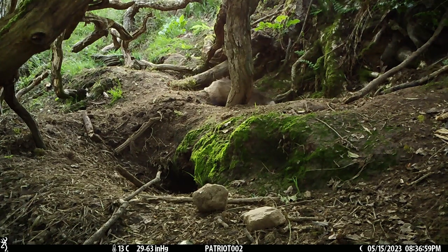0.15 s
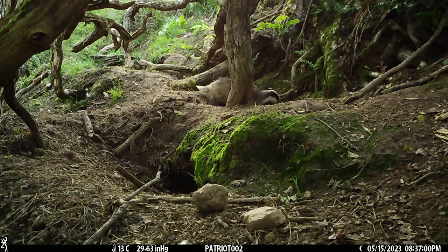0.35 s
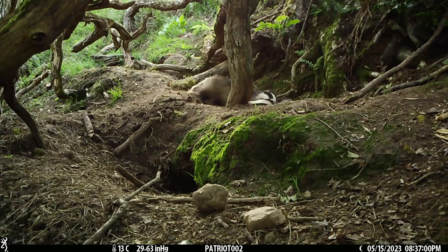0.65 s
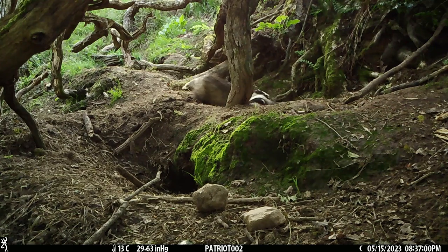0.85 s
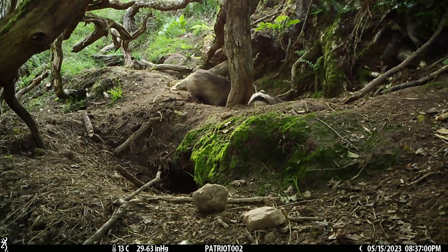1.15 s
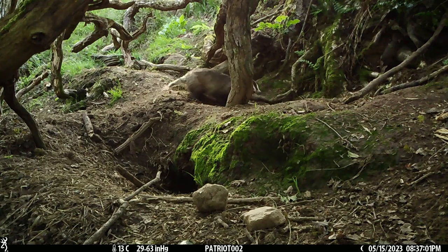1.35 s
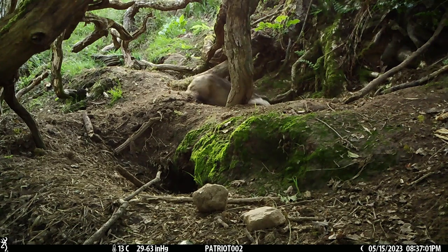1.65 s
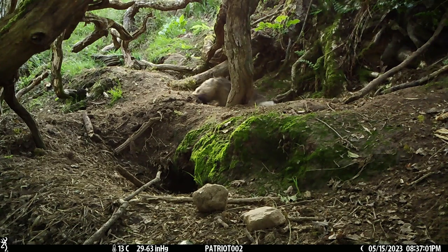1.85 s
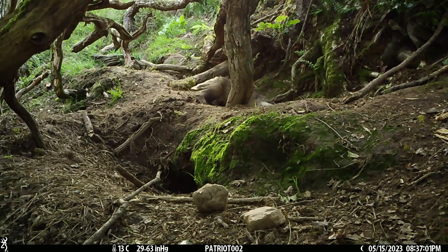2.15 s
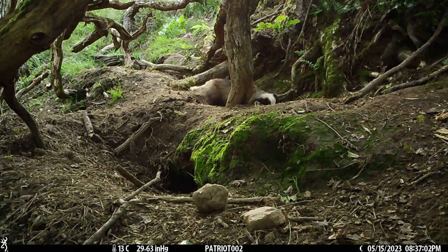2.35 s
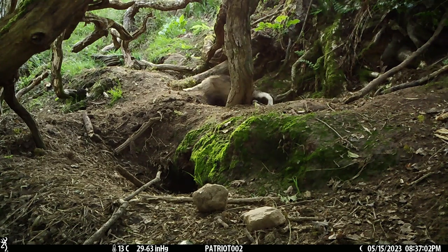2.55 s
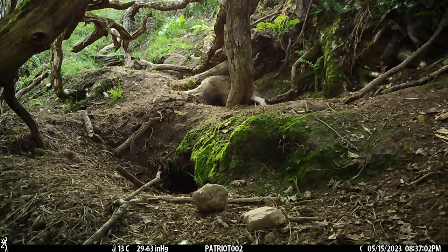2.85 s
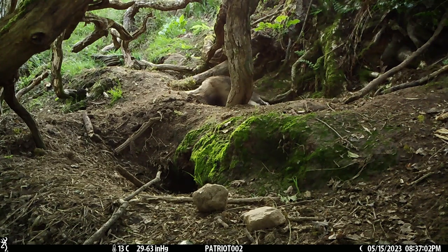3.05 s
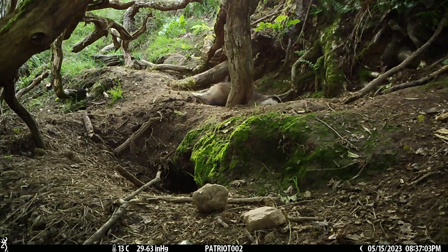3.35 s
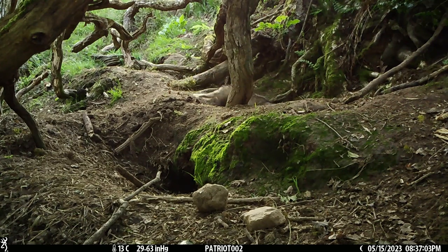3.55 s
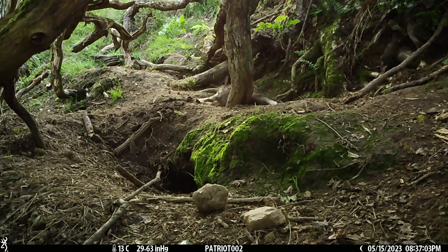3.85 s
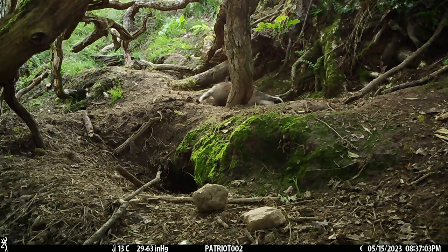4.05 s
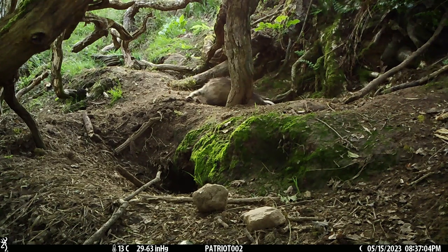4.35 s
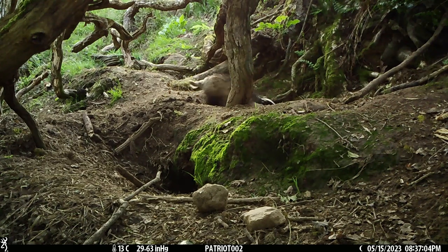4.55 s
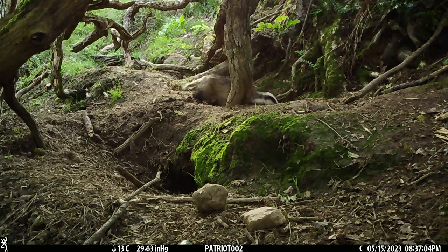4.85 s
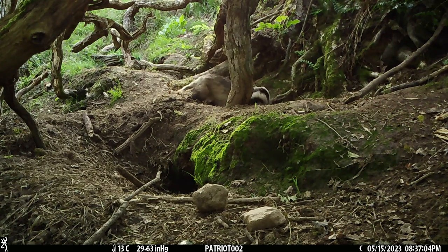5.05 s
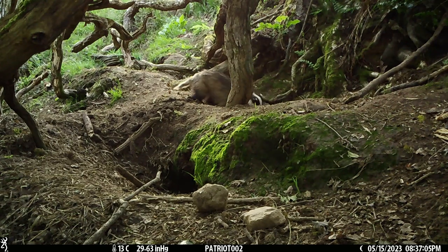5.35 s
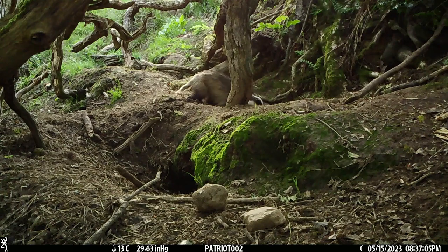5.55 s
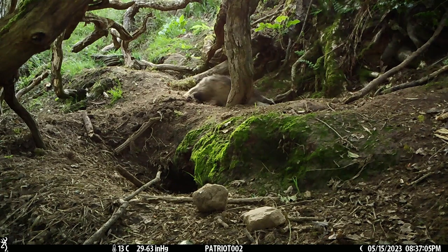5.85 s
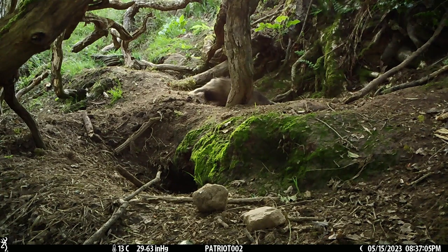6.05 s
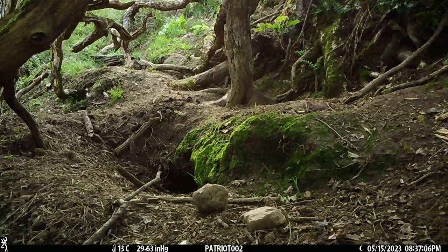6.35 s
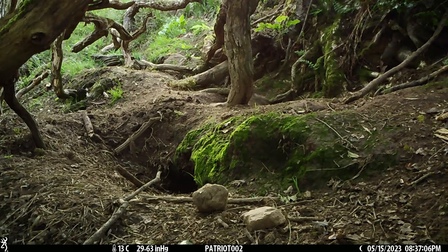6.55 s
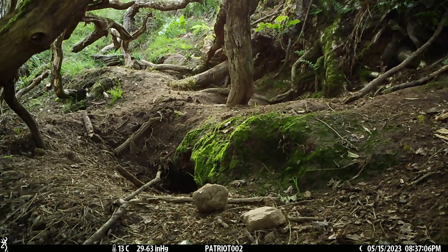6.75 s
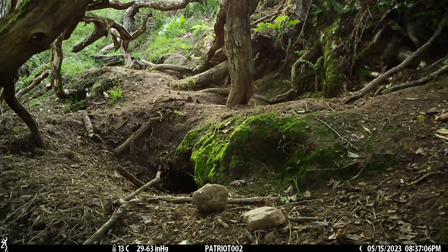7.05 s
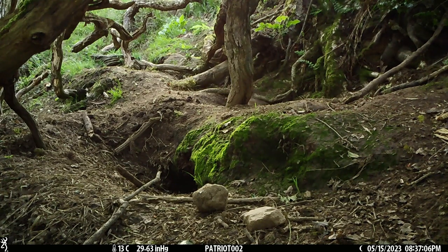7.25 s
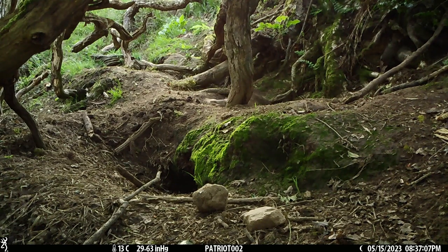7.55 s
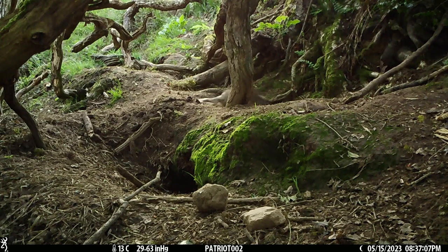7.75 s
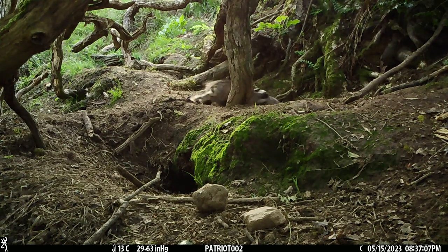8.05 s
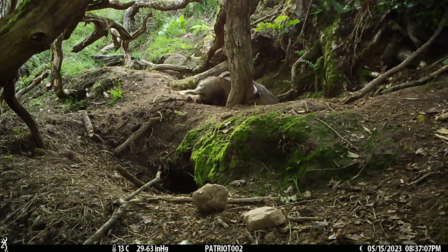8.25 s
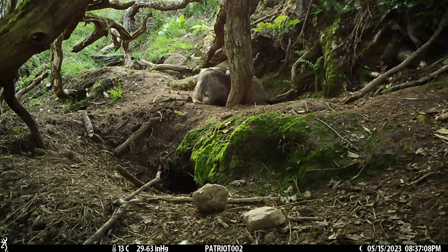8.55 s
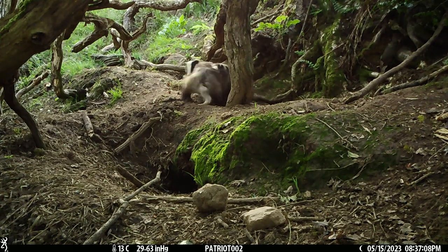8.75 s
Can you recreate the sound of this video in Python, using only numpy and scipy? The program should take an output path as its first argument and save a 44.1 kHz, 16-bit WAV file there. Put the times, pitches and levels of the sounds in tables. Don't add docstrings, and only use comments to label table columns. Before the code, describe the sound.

Small camera microphone among trees: constant hiss, a fluttering electrical buzz, faint whine and fast ticking. Birds whistle and chirp first, then crisp leaf scuffs and dull paw thuds come in bursts, with one sharp squeaky yelp. After a quieter gap a thrush sings five short rising pairs of notes, and a mellow whistle leads into a rapid, diving trill, all with grainy woodland reverberation.

```python
import sys
import numpy as np
from scipy import signal
from scipy.fft import rfft, irfft
from scipy.io import wavfile
from scipy.ndimage import uniform_filter1d

SR = 44100
rng = np.random.default_rng(int(sys.argv[2]) if len(sys.argv) > 2 else 0)


def dump_mix(stems):
    frames = np.atleast_2d(stems).T
    limited = np.clip(frames, -1, 1)
    pcm = np.round(limited * 32767).astype(np.int16)
    wavfile.write(sys.argv[1], SR, pcm)


def amplitude_ratio(level_db):
    exponent = np.asarray(level_db, float) / 20
    return 10 ** exponent


N = 392049
T = np.arange(N) / SR

# pitch_hz, density_db_per_hz
HISS_SPECTRUM = [(24, -40), (40, -6), (183, -10), (510, -3), (1190, -1.5), (2010, -4), (2340, -2.5),
                 (2520, -5), (2850, -6.5), (4040, -5.5), (5060, -10.5), (5590, -16.5), (7550, -15.5),
                 (8550, -17), (15600, -24.5)]
HISS_DB = -56.5
BUZZ_HZ, BUZZ_DOWN_S, BUZZ_UP_S = 30.5051, .01572, .03176
# pitch_hz, delay_s, length_s, level_db
WHINE_BURSTS = [(2550, 0.018, 0.013, -57), (2530, 0.0337, 0.022, -65), (5100, 0.023, 0.014, -69),
                (7640, 0.022, 0.029, -72), (9970, 0.015, 0.036, -76.5)]
# delay_s, level_db
TICK_SPIKES = [(.0016, -41.5), (.0166, -53), (.0209, -51)]
CYCLES_PER_S = 20

# start_s, length_s, start_hz, end_hz, level_db
FAR_GLIDES = [(0, 0.024, 3160, 3040, -53.5), (.76, 0.088, 7600, 7050, -70.5), (.84, 0.071, 6830, 7400, -72),
              (.985, 0.03, 6820, 6870, -70.5), (1.78, .17, 7360, 6770, -75.5),
              (3.27, 0.038, 3020, 3450, -60.5), (3.31, 0.028, 3650, 4410, -57.5),
              (3.675, 0.043, 3960, 3920, -58), (3.72, 0.046, 3880, 3490, -63),
              (4.03, 0.096, 2390, 2255, -64.5), (7.02, 0.054, 4130, 4440, -67.5),
              (7.41, 0.1, 1488, 1568, -63.5), (8.638, 0.066, 1730, 1637, -54.5)]
# start_s, length_s, pitch_hz, level_db
FAR_LEVEL_NOTES = [(0, 0.031, 1960, -63), (.77, 0.023, 1840, -62), (1.19, .02, 5140, -62),
                   (1.345, .035, 5100, -70), (2.99, 0.15, 5130, -69.5), (3.333, .055, 4620, -64),
                   (3.55, 0.11, 5120, -68), (3.72, 0.064, 1850, -71), (4.873, 0.012, 1700, -62),
                   (5.93, .09, 4370, -69), (8.6, .05, 2290, -60), (8.727, 0.085, 1697, -62)]
# start_s, length_s, level_db
DOVE_COOS = [
    (.08, .32, -75),
    (1.28, .32, -73),
    (4.27, 0.22, -75),
    (4.68, 0.19, -75),
    (6.38, 0.21, -87),
]
COO_START_HZ, COO_END_HZ, COO_BOW = 480, 452, 0.0245
# start_s, length_s, level_db
OPENING_WHISTLES = [
    (.095, .023, -42),
    (.122, .043, -31),
]
OPENING_HZ = 3832
# start_s, length_s, start_hz, end_hz, level_db
TREE_GLIDES = [
    (.105, 0.027, 2590, 3100, -54),
    (.845, 0.036, 4020, 5100, -64),
    (.89, 0.054, 5100, 3900, -64),
    (1.022, 0.017, 3640, 3620, -58),
    (1.08, .02, 3150, 4270, -72),
]
# start_s, length_s, start_hz, end_hz, level_db
HOOKED_WHISTLES = [
    (.74, 0.084, 3560, 3076, -53),
    (.85, 0.1, 2100, 2450, -58.5),
    (1.16, 0.033, 3830, 3520, -55),
]
HOOK_BOW = .14

# time_s, pitch_hz, level_db
BUZZY_SYLLABLE = [(0, 4050, -0.5), (.016, 3920, -3), (.032, 3870, -2.5), (.045, 3650, -23)]
# time_s, pitch_hz, level_db
THIN_UPPER_VOICE = [(0, 7600, -10), (.02, 6660, -7), (.045, 5900, -10), (.06, 5100, 1), (.075, 5050, -2)]
# start_s, level_db
BUZZY_TIMES = [
    (.224, -44),
    (.31, -43),
    (.391, -43),
    (.466, -47.5),
    (.549, -64),
]
BUZZY_RATIO = 0.96

# pitch_hz, width_hz, level_db
LITTER_RESONANCES = [(1470, 600, -61), (1995, 400, 7), (2830, 1360, -1), (3530, 450, 7.5), (4880, 430, 0),
                     (7500, 930, -40)]
# start_s, length_s, level_db, high_minus_low_db, pitch_ratio
LEAF_CRACKS = [(1.237, .015, -34, -3, 1.01), (1.248, 0.023, -44.5, -0.5, 1.04),
               (1.305, 0.037, -43, -2, 0.98), (2.092, 0.0063, -46.5, -2, .99), (2.235, 0.01, -53, -1, 1.0),
               (2.655, .011, -42.5, -3, 0.81), (2.674, 0.0014, -32, -2.5, 0.87),
               (2.692, .003, -48.5, 7, 1.04)]
# start_s, length_s, level_db,
# high_minus_low_db, pitch_ratio
LEAF_SHUFFLES = [(1.081, 0.066, -51.5, -23, 1.25), (1.217, 0.042, -47.5, -5, 1.04),
                 (1.377, 0.058, -50, -21, 1.3), (1.959, 0.035, -47, -9, .92), (2.05, 0.04, -59, 1.5, 1.02),
                 (2.2, .034, -58, -5, 1), (2.515, 0.025, -58.5, 12.5, 1.12), (2.521, 0.031, -34, -7, 0.92),
                 (2.526, 0.034, -50, 5, 1.03), (2.58, 0.13, -53.5, 0, 1.01),
                 (2.682, 0.035, -49, -1.5, 0.78), (2.723, .054, -67, 10.5, 0.99)]
CRACK_ATTACK, SHUFFLE_ATTACK = 0.028, 0.34
# start_s, pitch_hz, level_db
PAW_THUDS = [
    (1.224, 407, -50),
    (1.245, 520, -53),
    (1.964, 745, -53),
    (1.971, 420, -53.5),
    (5.427, 444, -49),
    (5.439, 516, -66),
]

# time_s, pitch_hz, level_db
YELP_CONTOUR = [(2.519, 850, -52), (2.5255, 900, -27), (2.528, 960, -27), (2.533, 1030, -19.5),
                (2.5365, 1040, -24), (2.54, 1030, -42), (2.5432, 1020, -27), (2.548, 1020, -40),
                (2.6, 1030, -52)]
# multiple, level_db at full effort, extra db lost per db of lower effort
YELP_OVERTONES = [(1, -18.5, -0.11), (1.6, -28, -0.061), (2.001, 2, 0.32), (2.5, -18.5, 0.23),
                  (3, -12, -0.0089), (3.5, -24, 0.25), (4.5, -19, .5), (5, -15.5, 0.32), (6, -29, 0.48),
                  (7, -37.5, .6)]
# time_s, voice pitch_hz, level_db
YELP_LATE_FOURTH = [(2.524, 980, -52), (2.533, 1035, -28), (2.539, 1035, -39), (2.55, 1030, -37),
                    (2.575, 1030, -54)]

# time_s, pitch_hz, level_db
THRUSH_LOW_ARCH = [(-.003, 2190, -13), (.01, 2484, 1), (.03, 2425, 4.5), (.045, 2284, -4.5),
                   (.065, 2132, -10), (.1, 2135, -26.5)]
# time_s, pitch_hz, level_db
THRUSH_HIGH_ARCH = [(0, 2120, -5), (.013, 2390, -21), (.021, 2774, -1), (.035, 3118, -3.5),
                    (.068, 3170, 0.5), (.084, 2857, -2), (.105, 2436, -14.5)]
# start_s, high_note_wait_s, level_db, pitch_ratio
THRUSH_PHRASES = [(4.992, 0.11, -47, 1.017), (5.419, .112, -43.5, .99), (5.89, 0.11, -44, .98),
                  (6.36, .113, -43.5, 0.98), (6.917, 0.12, -45.5, .96)]
HIGH_NOTE_DB, HIGH_NOTE_FOLLOWS = -39.4, .2
HIGH_NOTE_RATIO, HIGH_PITCH_FOLLOWS = .99, 0.633

# time_s, pitch_hz, level_db
FLUTING_CONTOUR = [(7.6, 1545, -73), (7.635, 1853, -63), (7.65, 2120, -57.5), (7.709, 2040, -52),
                   (7.782, 1910, -60), (7.87, 1900, -54), (7.949, 1901, -53), (8.0, 1890, -72)]
# time_s, pitch_hz, level_db
TRILL_DIVE = [(0, 3700, -5.5), (.017, 3806, -3), (0.024, 3485, 5), (0.026, 2550, 1), (0.034, 3212, -2.5),
              (.046, 3250, 1.5), (.058, 2750, 4), (0.064, 2600, -14), (.075, 3300, -21)]
# start_s, level_db, slowing, lead_in_pitch_ratio
TRILL_SYLLABLES = [(8.173, -47.5, 0.99, 1.04), (8.288, -50.5, 1, 1.03), (8.405, -48, 0.91, 1.06),
                   (8.514, -47.5, 1.04, .96), (8.636, -45.5, .86, .99), (8.76, -47.5, 1.09, 1.02),
                   (8.872, -53, .8, 0.77)]
TRILL_RATIO, TRILL_SAG_PER_S = 1.06, .13
# time_s from the drop, pitch_hz, level_db
DROP_SHAPE = [(-.05, 2036, -15), (-.03, 2240, -1), (0, 2350, 3), (.012, 1950, -2.5), (.025, 1620, -1)]
# drop_s, level_db, slowing
DROP_TIMES = [
    (8.307, -51, 1.0),
    (8.42, -49.5, .7),
]

BAND_EDGE_HZ = 5330
FLUTTER = uniform_filter1d(uniform_filter1d(rng.standard_normal(N), 200), 200) * np.sqrt(300)


def rms_one(x):
    return x / np.sqrt(np.mean(x ** 2) + 1e-20)


def without_bass(x, hz, order=1):
    return signal.sosfilt(signal.butter(order, hz, "high", fs=SR, output="sos"), x)


def drift(per_s):
    lowpass = signal.butter(2, per_s, fs=SR, output="sos")
    return rms_one(signal.sosfilt(lowpass, rng.standard_normal(N + SR))[SR:])


def resonance(x, hz, width_hz):
    r = np.exp(-np.pi * width_hz / SR)
    return signal.lfilter([(1 - r * r) / 2, 0, (r * r - 1) / 2], [1, -2 * r * np.cos(2 * np.pi * hz / SR), r * r], x)


def add_voice(out, rows, orders=((1, 0, 0), (2, -50, 0)), wobble=0, wobble_hz=190, rough=0):
    s, hz, level_db = np.transpose(sorted(rows))
    a, b = max(int(s[0] * SR), 0), min(int(s[-1] * SR), N)
    t = T[a:b]
    unsteady = 1 + wobble * np.sin(2 * np.pi * wobble_hz * t) + rough * FLUTTER[a:b]
    pitch = uniform_filter1d(np.interp(t, s, hz), size=150, mode="nearest")
    phase = 2 * np.pi * np.cumsum(pitch * unsteady) / SR
    ends = np.clip(np.minimum(t - s[0], s[-1] - t) / .0035, 0, 1)
    effort = uniform_filter1d(np.interp(t, s, level_db), size=60, mode="nearest")
    below_peak = effort - level_db.max()
    partials = sum(amplitude_ratio(effort + db + loss * below_peak) * np.cos(k * phase) for k, db, loss in orders)
    out[a:b] -= np.sqrt(2) * ends * partials


def placed(shape, start, level_db, ratio, slowing=1):
    return [(start + s * slowing, hz * ratio, db + level_db) for s, hz, db in shape]


def woods(x, t60, direct_db, tail_db, early_db, early_s, flicker_db=0):
    t = T[:SR]
    scatter = rng.standard_normal(SR) * amplitude_ratio(4 * rng.standard_normal(SR)) * np.clip(t / .005, 0, 1)
    tail = scatter * amplitude_ratio(-60 * t / t60)
    early = scatter * np.exp(-t / early_s)
    echo = amplitude_ratio(tail_db) * tail / np.linalg.norm(tail) + amplitude_ratio(early_db) * early / np.linalg.norm(early)
    flicker = amplitude_ratio(flicker_db * np.minimum(FLUTTER, .5))
    return amplitude_ratio(direct_db) * x + flicker * signal.fftconvolve(x, echo)[:N]


def hiss():
    hz = np.maximum(np.arange(N // 2 + 1) * SR / N, 1)
    spectrum_hz, spectrum_db = np.transpose(HISS_SPECTRUM)
    shape = np.interp(np.log(hz), np.log(spectrum_hz), spectrum_db)
    noise = irfft(rfft(rng.standard_normal(N)) * amplitude_ratio(shape), N)
    return amplitude_ratio(HISS_DB - 4.0 + .5 * drift(0.25)) * rms_one(noise)


def buzz():
    def bump(at, width):
        away = (((T - at) * BUZZ_HZ + .5) % 1 - .5) / BUZZ_HZ
        return np.exp(-.5 * (away / width) ** 2)

    def ramp(at):
        return bump(at + .00005, .00009) + .6 * bump(at - .00018, .00014)

    steps = amplitude_ratio(-51.0) * ramp(BUZZ_UP_S) - amplitude_ratio(-47.5) * ramp(BUZZ_DOWN_S)
    return without_bass(steps, 170) + amplitude_ratio(-78) * np.sin(2 * np.pi * BUZZ_HZ * T)


def whine():
    out, waver = np.zeros(N), drift(59.2)
    for hz, delay, length, level_db in WHINE_BURSTS:
        gate = np.sin(np.pi * np.clip((T % (1 / CYCLES_PER_S) - delay) / length, 0, 1))
        unsteady = amplitude_ratio(1.5 * drift(15))
        tone = np.sin(2 * np.pi * np.cumsum(hz * (1 + 0.017 * waver)) / SR)
        out += amplitude_ratio(level_db) * unsteady * gate * tone
    return out


def ticks():
    cycle = (T * CYCLES_PER_S).astype(int)
    strength = rng.random((N * CYCLES_PER_S // SR + 1, len(TICK_SPIKES)))[cycle] ** 1.8
    spikes = np.zeros(N)
    for k, (delay, db) in enumerate(TICK_SPIKES):
        spikes -= amplitude_ratio(db) * strength[:, k] * np.exp(-.5 * ((T % (1 / CYCLES_PER_S) - delay) / .00008) ** 2)
    return without_bass(spikes + 1e-18, 200)


def whistles(rows, rough, bow=0, swell_db=5):
    out, part = np.zeros(N), np.linspace(0, 1, 7)
    off_centre = 2 * part - 1
    for start, length, start_hz, end_hz, level_db in rows:
        straight = start_hz + (end_hz - start_hz) * part
        bend = straight + bow * (start_hz + end_hz) / 2 * (1 - off_centre ** 2)
        swell = level_db - swell_db * off_centre ** 4
        add_voice(out, list(zip(start + part * length, bend, swell)), rough=rough)
    return out


def far_calls():
    level = [(s, length, hz, hz, db) for s, length, hz, db in FAR_LEVEL_NOTES]
    return whistles(FAR_GLIDES + level, rough=.008)


def dove():
    coos = [(s, length, COO_START_HZ, COO_END_HZ, db) for s, length, db in DOVE_COOS]
    return whistles(coos, rough=.015, bow=COO_BOW)


def opening_whistles():
    rows = [(s, length, OPENING_HZ, OPENING_HZ, db) for s, length, db in OPENING_WHISTLES]
    return whistles(rows, rough=.004, swell_db=11)


def buzzy_notes():
    out = np.zeros(N)
    for start, level_db in BUZZY_TIMES:
        note = placed(BUZZY_SYLLABLE, start + .004, level_db - 1, BUZZY_RATIO)
        upper = placed(THIN_UPPER_VOICE, start - .012, level_db - 13.5, BUZZY_RATIO, .72)
        add_voice(out, note, wobble=.075, wobble_hz=450, rough=.028)
        add_voice(out, upper, wobble=0.034, rough=0.043)
    return out


def leaves():
    grain = amplitude_ratio(2.5 * rng.exponential(1, N).clip(0, 4))
    crackle = rms_one(rng.standard_normal(N) * grain * (rng.random(N) < .4))
    out = np.zeros(N)
    for rows, attack in ((LEAF_CRACKS, CRACK_ATTACK), (LEAF_SHUFFLES, SHUFFLE_ATTACK)):
        for start, length, level_db, high_db, ratio in rows:
            a, b = int(start * SR), int((start + 2 * length + .01) * SR)
            bends = start + length * np.array([0, np.clip(attack, .01, .7), .8, 1.3])
            scuff = np.interp(T[a:b], bends, [0.32, 0.77, 0.37, 0.063]) * crackle[a:b]
            for k, (hz, width, db) in enumerate(LITTER_RESONANCES):
                gain = amplitude_ratio(level_db + db + 8.0 + high_db * (k > 2))
                out[a:b] += gain * resonance(scuff, hz * ratio, width) * (-1) ** k
    return out


def paws():
    noise, out = rng.standard_normal(N), np.zeros(N)
    for s, hz, db in PAW_THUDS:
        puff = noise * (T > s) * np.exp(-np.abs(T - s) / 0.01)
        out += amplitude_ratio(db + 19) * resonance(puff + 1e-18, hz, 100.0)
    return out


def yelp():
    out = np.zeros(N)
    add_voice(out, YELP_CONTOUR, YELP_OVERTONES, rough=0.0054)
    add_voice(out, YELP_LATE_FOURTH, [(4.025, 0, 0)], rough=0.011)
    return without_bass(out + 1e-18, 700, order=2)


def thrush():
    out = np.zeros(N)
    mean_db, mean_ratio = np.mean(THRUSH_PHRASES, axis=0)[2:]
    for start, wait, level_db, ratio in THRUSH_PHRASES:
        add_voice(out, placed(THRUSH_LOW_ARCH, start, level_db, ratio))
        high_db = HIGH_NOTE_DB + HIGH_NOTE_FOLLOWS * (level_db - mean_db)
        high_ratio = HIGH_NOTE_RATIO + HIGH_PITCH_FOLLOWS * (ratio - mean_ratio)
        add_voice(out, placed(THRUSH_HIGH_ARCH, start + wait, high_db, high_ratio), rough=.008)
    return out


def fluting():
    out = np.zeros(N)
    add_voice(out, FLUTING_CONTOUR, wobble=0.034, wobble_hz=42.6, rough=0.016)
    return out


def trill():
    out = np.zeros(N)
    for start, level_db, slowing, lead in TRILL_SYLLABLES:
        ratio = TRILL_RATIO - TRILL_SAG_PER_S * (start - TRILL_SYLLABLES[0][0])
        lead_in = [(s, hz * lead / ratio, db) for s, hz, db in TRILL_DIVE[:2]]
        add_voice(out, placed(lead_in + TRILL_DIVE[2:], start, level_db, ratio, slowing), rough=.006)
    return out


def drops():
    out = np.zeros(N)
    for at, level_db, slowing in DROP_TIMES:
        add_voice(out, placed(DROP_SHAPE, at, level_db, 0.99, slowing), rough=.006)
    return out


def scene():
    overhead = woods(opening_whistles(), t60=.8, direct_db=0, tail_db=-15, early_db=-20, early_s=.03, flicker_db=7)
    glides = whistles(TREE_GLIDES, rough=0.0053) + whistles(HOOKED_WHISTLES, rough=0.0092, bow=HOOK_BOW)
    middle = woods(glides + buzzy_notes() + trill() + drops(),
                   t60=.8, direct_db=-2, tail_db=-5, early_db=-9, early_s=.015, flicker_db=2)
    far = woods(far_calls() + dove() + fluting(), t60=.9, direct_db=-6, tail_db=-3, early_db=-5, early_s=.03)
    ground = woods(leaves() + paws() + yelp(), t60=.4, direct_db=0, tail_db=-21, early_db=-17, early_s=.012)
    near = woods(thrush(), t60=.95, direct_db=-1, tail_db=-4, early_db=-13, early_s=.018)
    camera = hiss() + buzz() + whine() + ticks()
    return (overhead + middle + far + ground + near + camera)[None]


def top_cut(x):
    return signal.sosfilt(signal.butter(12, 15710, fs=SR, output="sos"), x)


def record(dry):
    low_pass = signal.ellip(8, .5, 50, BAND_EDGE_HZ, fs=SR, output="sos")
    high_pass = signal.ellip(6, .5, 40, BAND_EDGE_HZ + 250, "high", fs=SR, output="sos")
    band = signal.sosfilt(low_pass, dry)
    leak = signal.sosfilt(high_pass, dry)
    return top_cut(band + amplitude_ratio(-1.0) * leak)


dry = scene()
out = record(dry)
dump_mix(out)
```